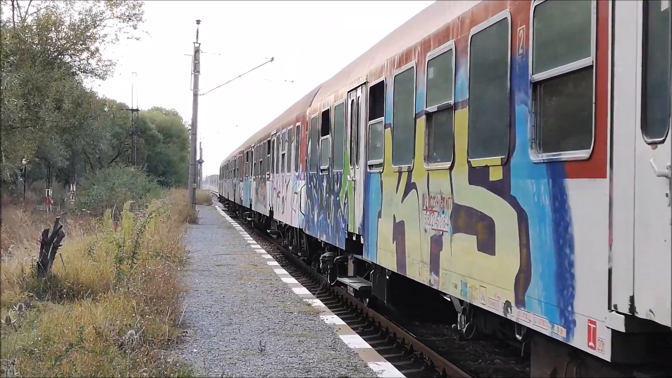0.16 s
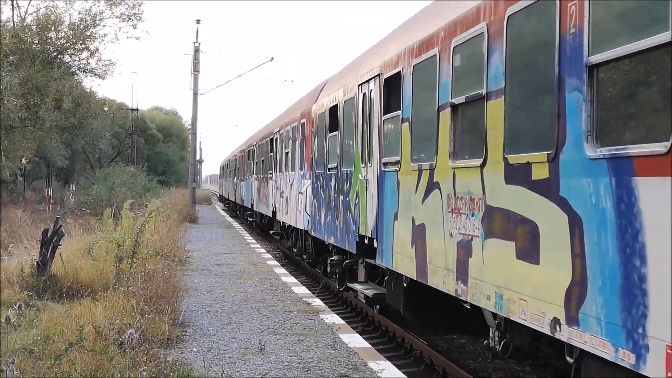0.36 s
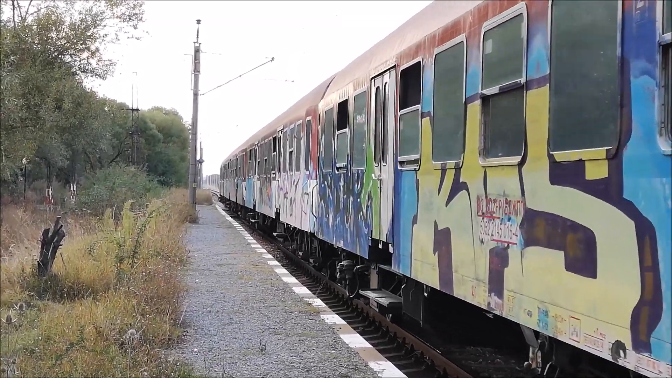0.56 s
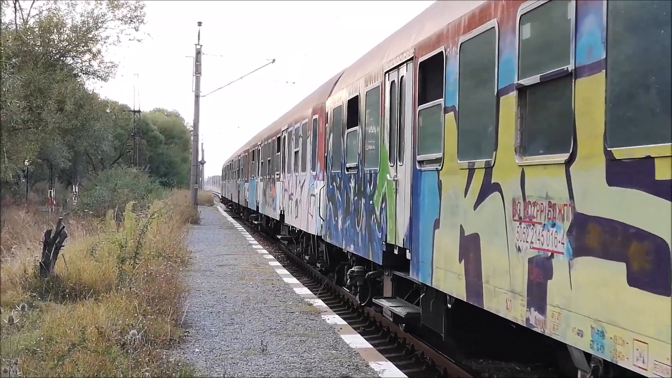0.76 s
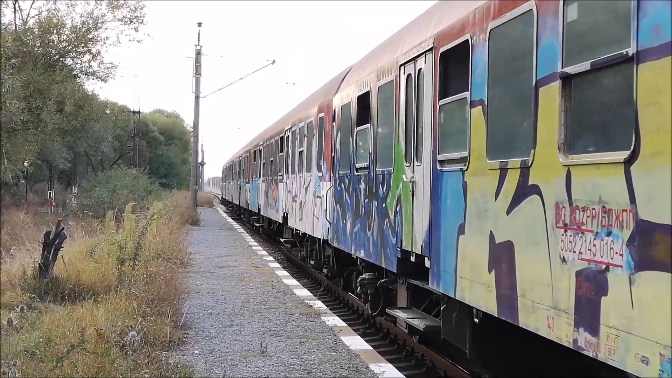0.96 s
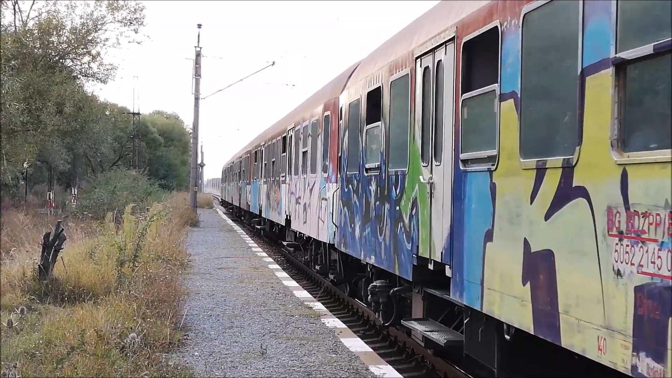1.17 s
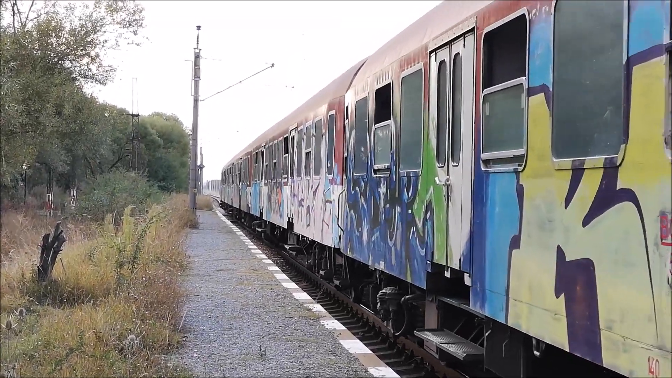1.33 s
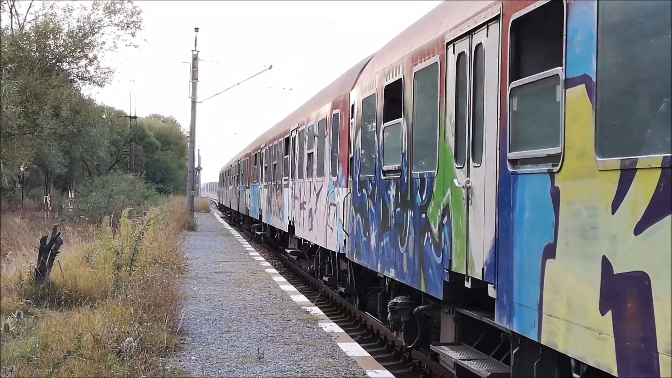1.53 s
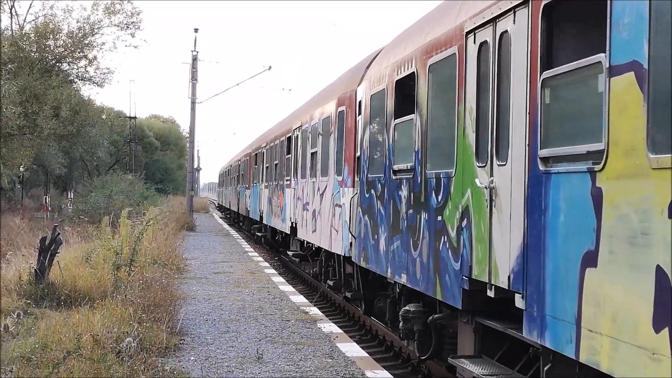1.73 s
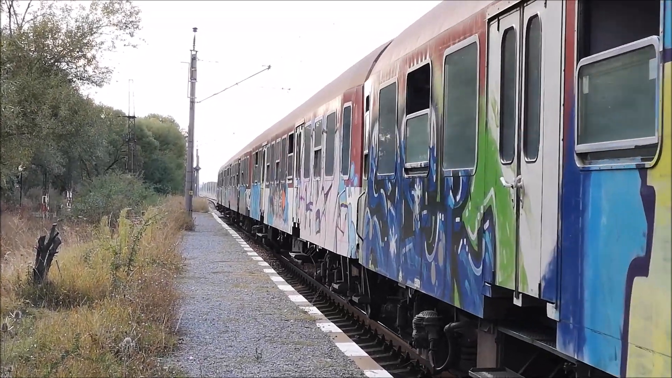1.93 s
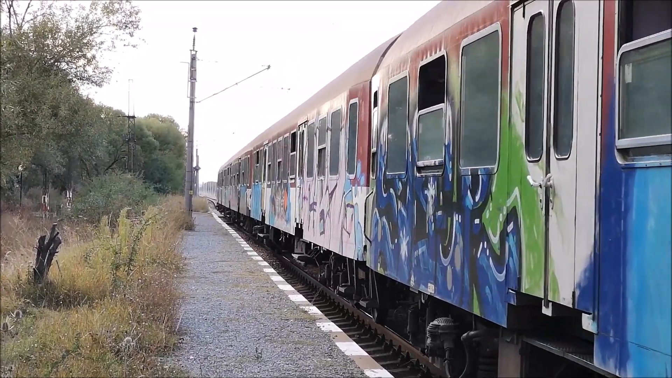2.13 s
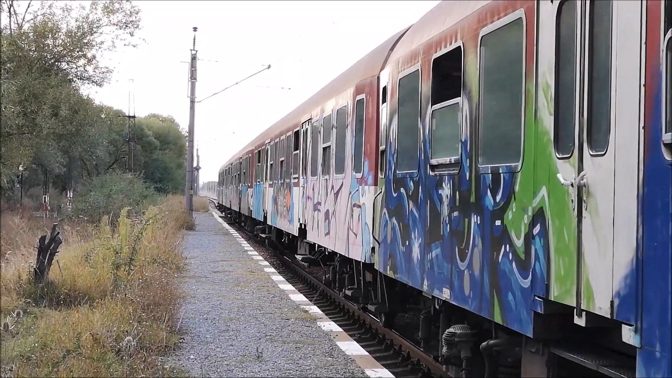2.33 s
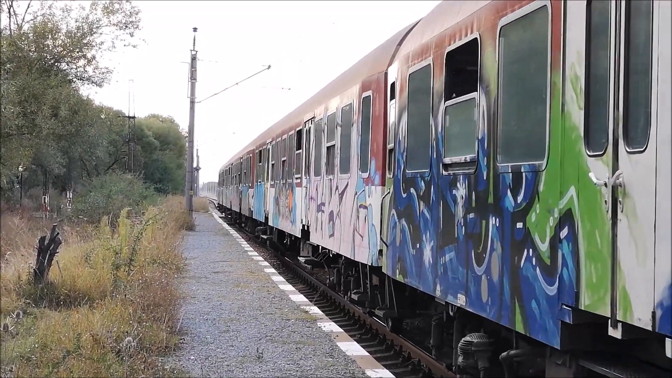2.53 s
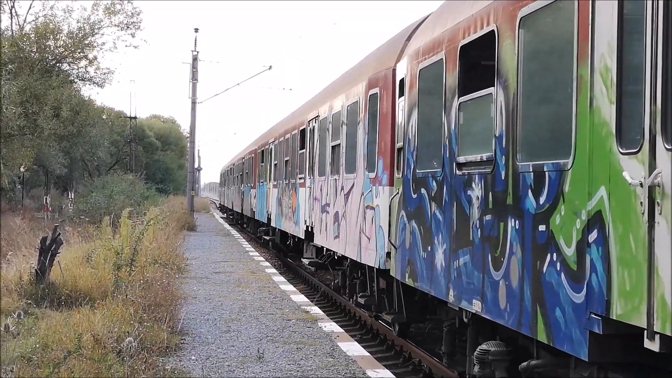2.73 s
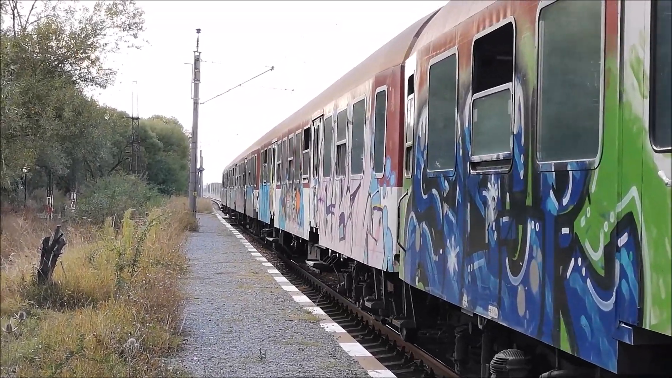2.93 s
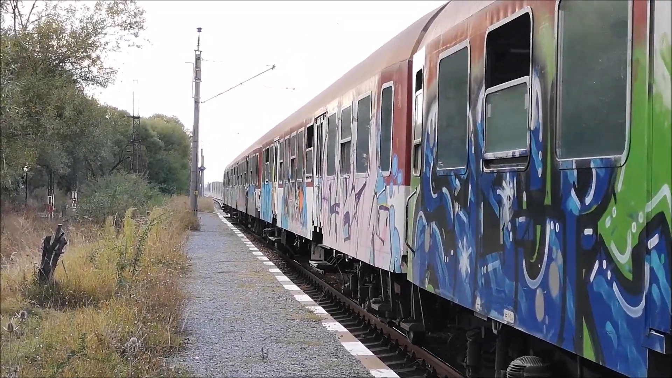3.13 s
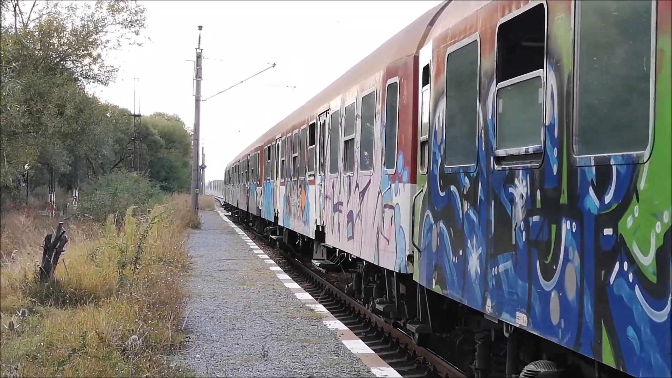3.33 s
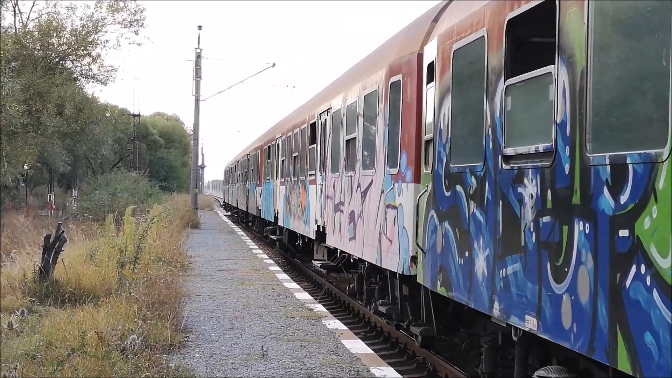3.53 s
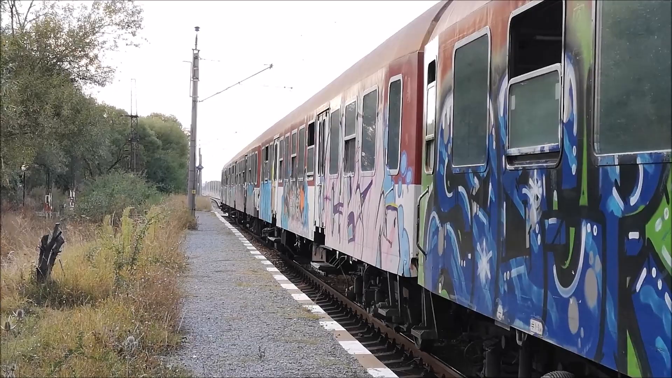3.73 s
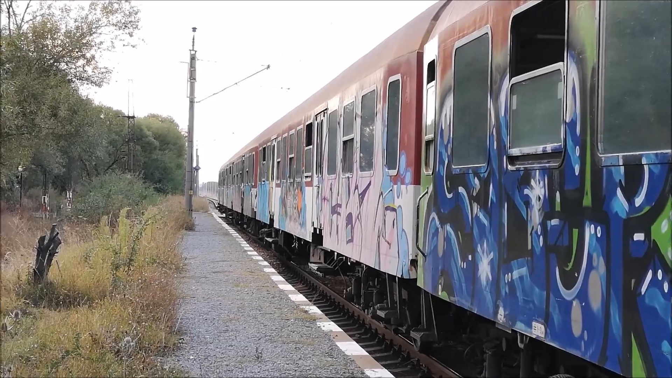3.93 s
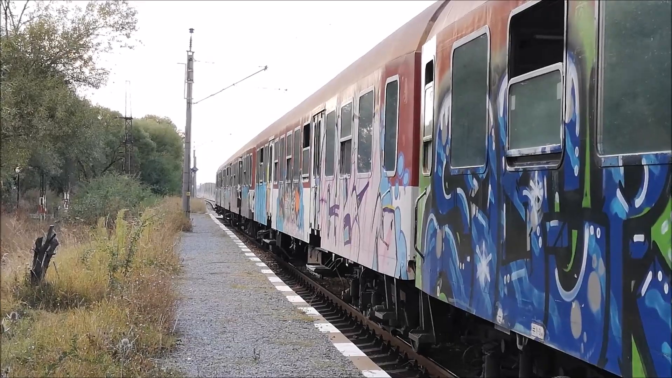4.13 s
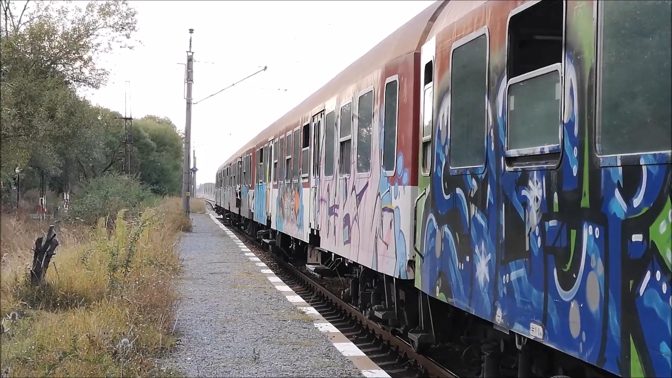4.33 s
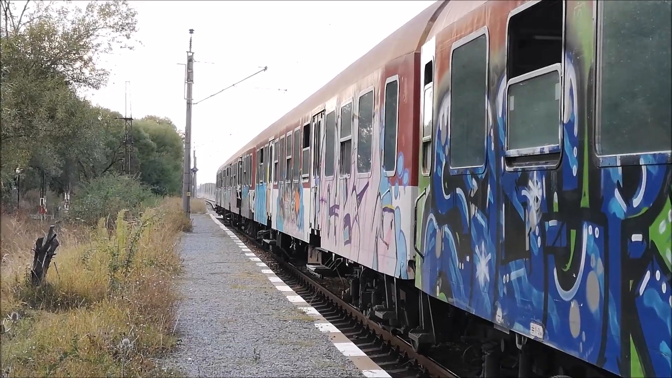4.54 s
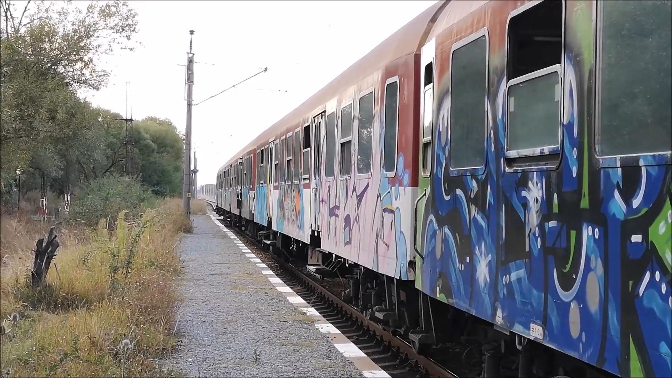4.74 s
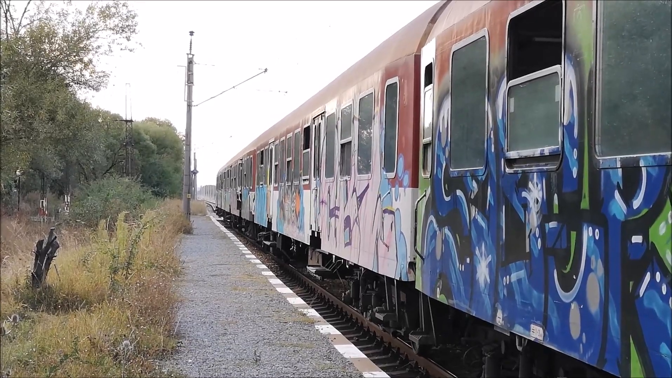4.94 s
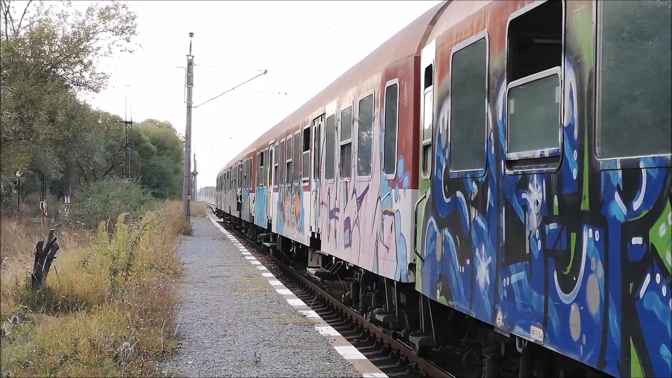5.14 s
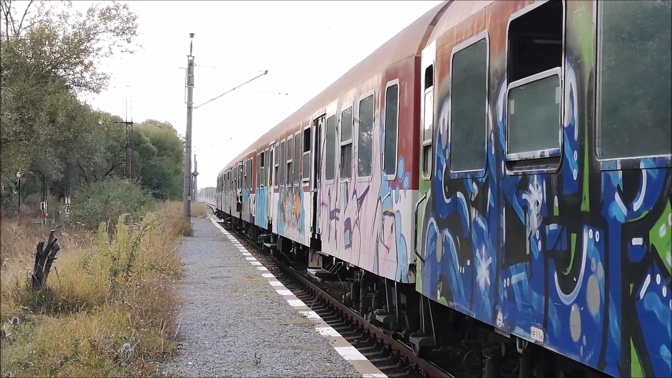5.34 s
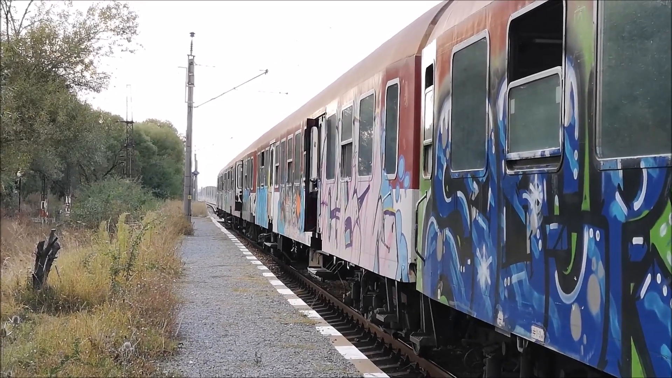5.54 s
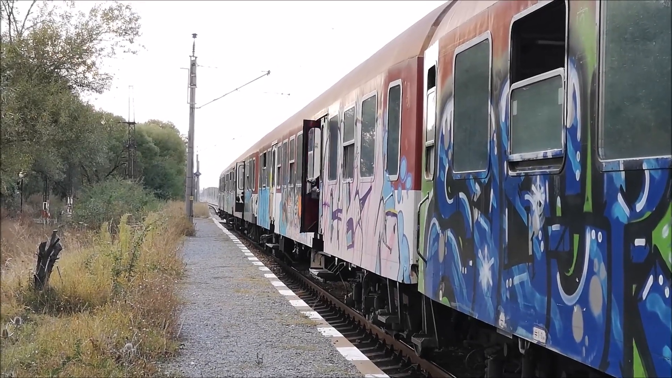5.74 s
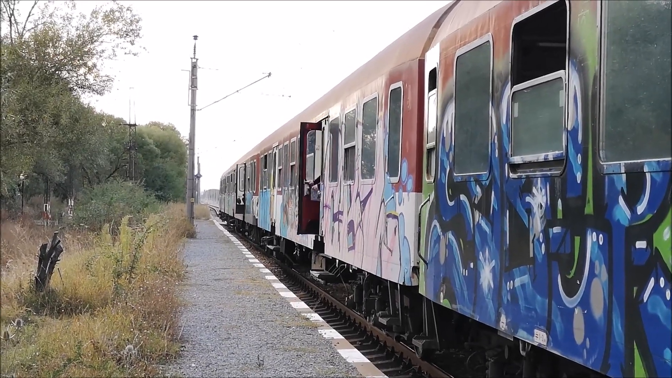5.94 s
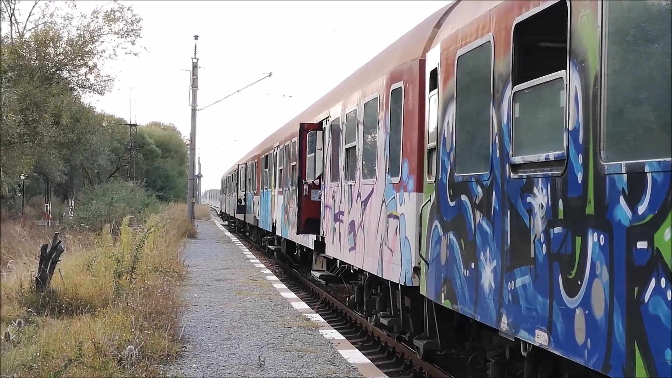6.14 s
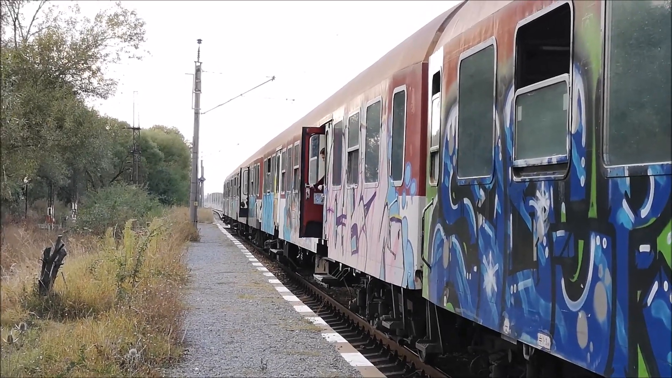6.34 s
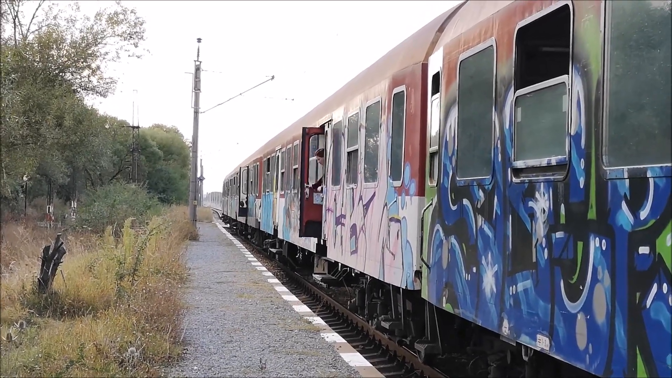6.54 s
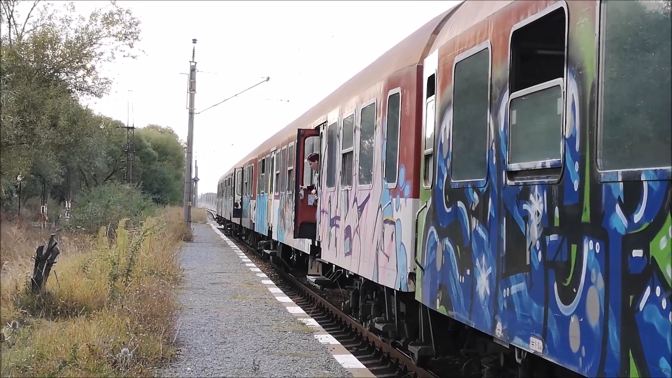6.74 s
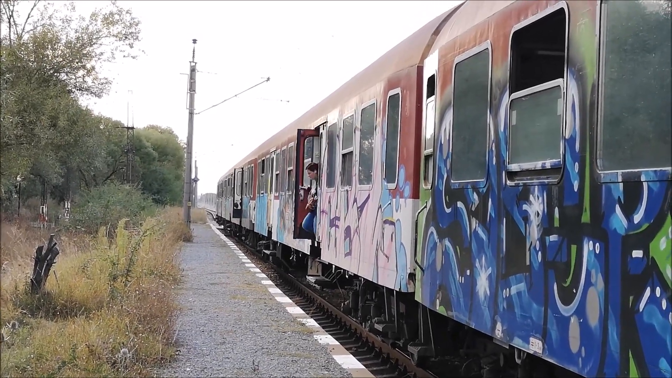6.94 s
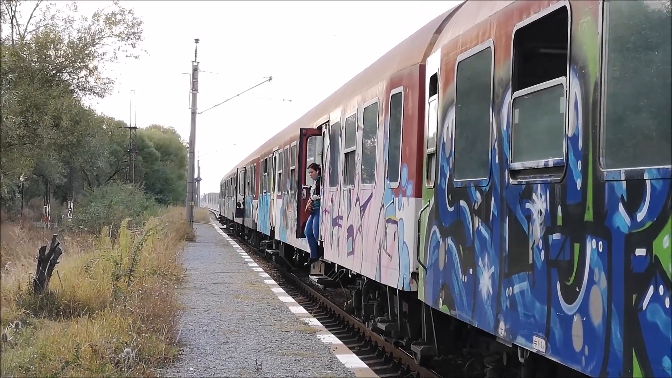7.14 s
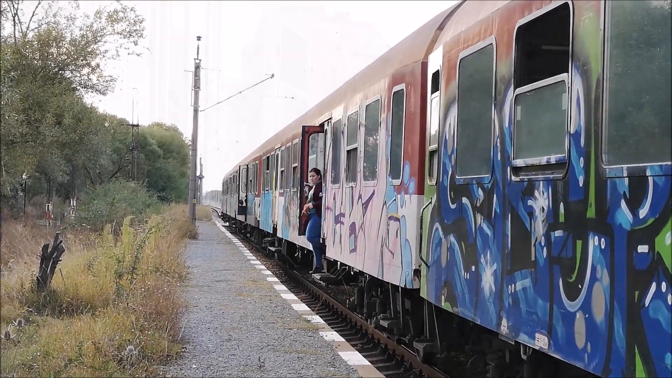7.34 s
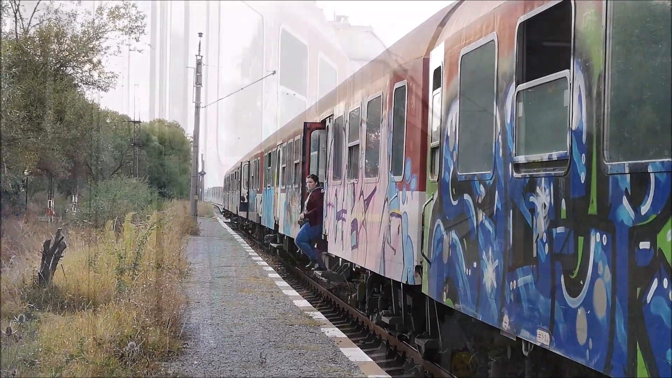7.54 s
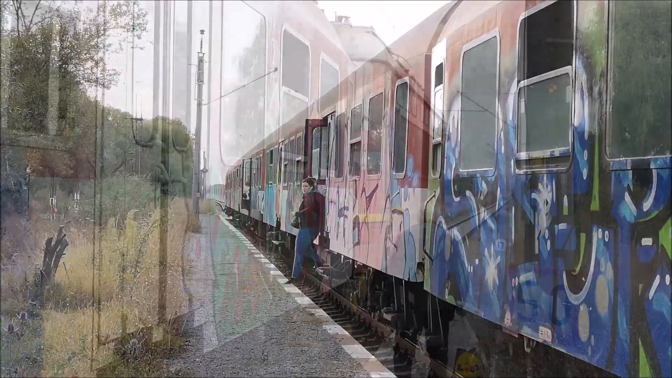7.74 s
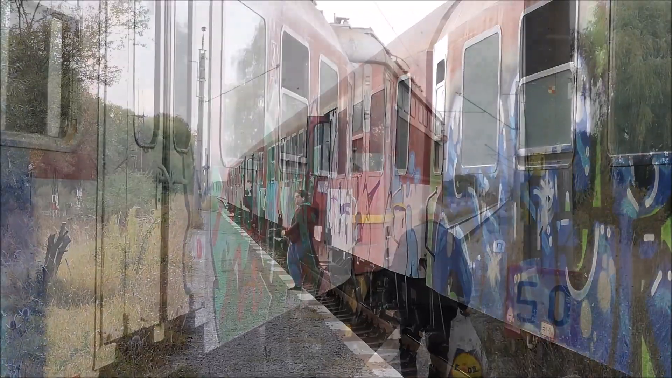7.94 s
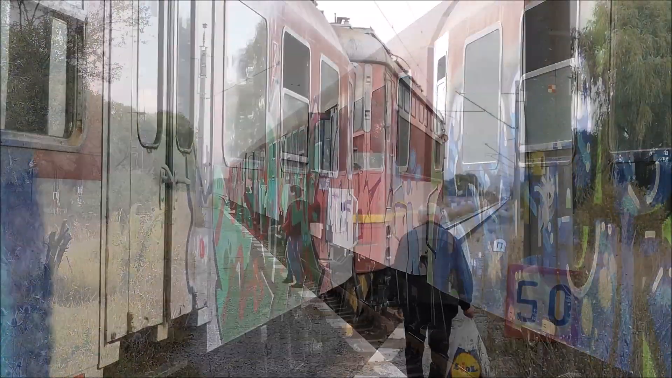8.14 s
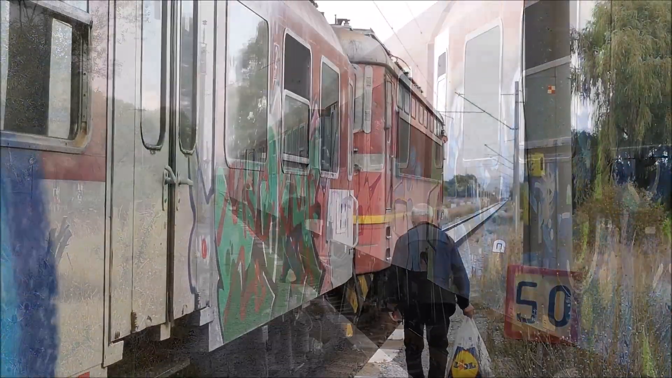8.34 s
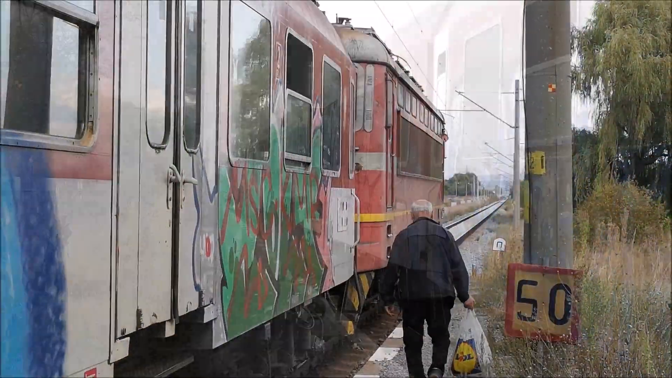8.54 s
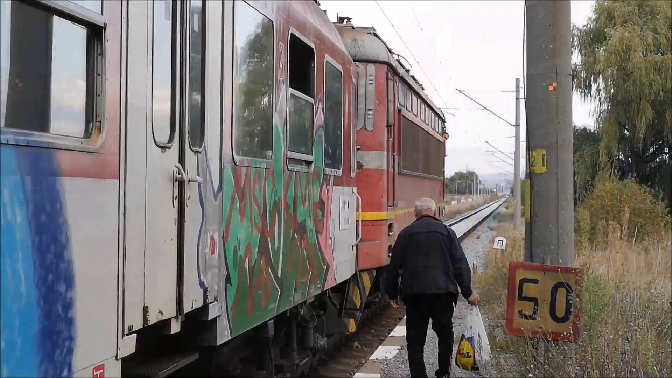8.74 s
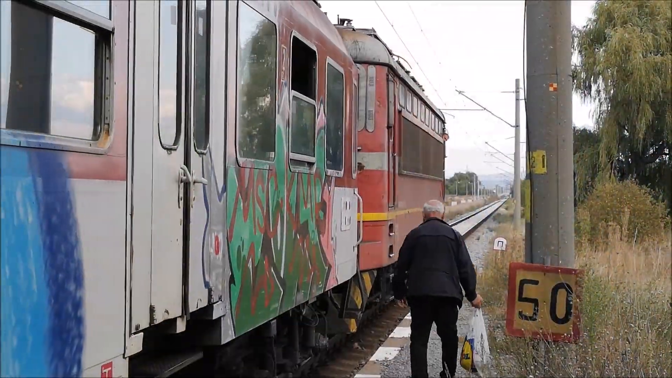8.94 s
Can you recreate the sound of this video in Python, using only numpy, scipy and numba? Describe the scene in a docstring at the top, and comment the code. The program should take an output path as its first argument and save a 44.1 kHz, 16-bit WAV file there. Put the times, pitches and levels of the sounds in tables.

```python
"""Train braking to a halt at a platform

A passenger train's wheels squeal, ever purer as they slow: friction-driven tones over coloured-noise rumble and grind.
The coaches creak and settle, air hisses from a ringing pipe, a door is unlatched with resonant knocks,
and a valve whistles and spits. Then comes the sound of a standing electric locomotive's blowers, growing louder:
duct noise and deep rumble under a blade tone that rises in surges."""
import sys
import numpy as np
from scipy import signal
from scipy.fft import rfft, irfft, next_fast_len
from scipy.io import wavfile
from scipy.ndimage import uniform_filter1d, minimum_filter1d, map_coordinates
from numba import njit

SR = 44100
rng = np.random.default_rng(int(sys.argv[2]) if len(sys.argv) > 2 else 0)


def wrap_up_sound(samples):
    """Save the sound to the file named by the first command line argument, as 16-bit audio."""
    columns = np.atleast_2d(samples).T
    # keep every value between -1 and 1, then stretch to whole-number steps
    tamed = np.clip(columns, -1, 1)
    steps = np.round(tamed * 32767).astype(np.int16)
    wavfile.write(sys.argv[1], SR, steps)


N = 400869

BITE_S, STOP_S = 3.454, 4.08  # the blocks bite hard; the wheels come to rest
LEAK_END = 8.35  # s

# Spectrum of deep rumble: [f/Hz, relative level/dB]
RUMBLE_SPECTRUM = [(11, -52), (18, 1.5), (48, 5.5), (130, -12), (170, -14), (290, -120)]
# Spectrum of droning hollow bodies: [f/Hz, relative level/dB]
DRONE_SPECTRUM = [(47, -24), (80, 2), (155, -0.5), (236, -5.5), (275, -10), (312, -13), (457, -15.5),
                  (700, -23.5), (910, -17), (1540, -120)]


def amp(db):
    """Decibels to gain."""
    return 10 ** (np.asarray(db) / 20)


def unit(x):
    """Scale to rms 1."""
    return x / np.sqrt(np.mean(np.abs(x) ** 2) + 1e-20)


def clock():
    """The time of every sample, in seconds."""
    return np.arange(N) / SR


def along(points, hz):
    """Read (Hz, value) points on a log frequency axis."""
    f, value = np.transpose(points)
    return np.interp(np.log(hz + 1), np.log(np.abs(f) + 1), value)


def train_speed():
    """The train's speed at every sample, as a share of its first speed."""
    # Braking curve: [t/s, share of the first speed]
    braking = [(0, 1), (1.5, 0.82), (3, 0.24), (3.6, 0.11), (4.2, 0.026)]
    s, share = np.transpose(braking)
    return np.interp(clock(), s, share)


def pan(db):
    """Left and right gains for a level difference; positive is louder on the left."""
    gains = amp(np.array([np.atleast_1d(db), -np.atleast_1d(db)]) / 2)
    return gains / np.sqrt(np.mean(gains ** 2, axis=0))


def wobble(rate):
    """A smooth random curve, rate knots a second."""
    return map_coordinates(rng.standard_normal(512), [clock() * rate], mode="wrap")


def held(start, end, rise_db_per_s, fall_db_per_s):
    """Gain that rises until start, holds at 1 and dies away after end."""
    t = clock()
    rise = abs(rise_db_per_s) * np.maximum(start - t, 0)
    fall = abs(fall_db_per_s) * np.maximum(t - end, 0)
    return amp(-rise - fall)


def swell(peak, rise, fall):
    """A bell-shaped gain, 10 dB down at rise seconds before its peak and fall seconds after."""
    t = clock() - peak
    return amp(-10 * np.minimum((t / np.where(t < 0, rise, fall)) ** 2, 20))


def receding(db_per_s):
    """Gain of the nearest bogie, which fades with the way travelled (db_per_s at the first speed)."""
    return amp(-db_per_s * np.cumsum(train_speed()) / SR)


def filtered(x, response):
    """x times a response of frequency."""
    m = next_fast_len(x.shape[-1] + SR // 8, real=True)
    return irfft(rfft(x, m) * response(np.fft.rfftfreq(m, 1 / SR)), m)[..., :x.shape[-1]]


def resonant(modes, size):
    """Stereo noise of rms 1 ringing in (Hz, width Hz, dB) resonances."""
    def body(f):
        total = 0
        for k, (centre, width, db) in enumerate(modes):
            peak = 1j * f * width / (centre * centre - f * f + 1j * f * width)
            total = total + (-1) ** k * amp(db) * peak  # neighbours alternate in sign
        return total
    return unit(filtered(rng.standard_normal((2, size)), body))


def rush(spectrum, ripple_db=0, spacing_hz=28):
    """Coloured stereo noise of rms 1, alike in the bass; ripple stands for the many close modes of steel parts."""
    # Stereo likeness: [f/Hz, left-right correlation]
    likeness = [(60, 1), (250, 0.97), (500, 0.14), (1000, 0.39), (2500, 0.15), (8000, .1)]

    def colour(hz):
        turn = np.arccos(np.clip(along(likeness, hz), -1, 1)) / 2
        modes = map_coordinates(rng.standard_normal(4096), [hz / spacing_hz], mode="wrap")
        return amp(along(spectrum, hz) + ripple_db * modes) * np.array([np.cos(turn), np.sin(turn)])

    mid, side = filtered(rng.standard_normal((2, N)), colour)
    return unit(np.array([mid + side, mid - side]))


def add(track, s, sound):
    """Mix a sound in at time s."""
    part = track[:, max(0, round(s * SR)):][:, :sound.shape[-1]]
    part += sound[..., :part.shape[-1]]


@njit
def resonate(kicks, keep):
    """Complex amplitude of a kicked mode that keeps a share of its motion at each step."""
    z = kicks.copy()
    for i in range(1, len(keep)):
        z[:, i] = keep[i] * z[:, i - 1] + np.sqrt(1 - keep[i] ** 2) * kicks[:, i]
    return z


def sing(hz, width_hz, skirt_hz=260, pure=0, size=16, pure_width_hz=2.07):
    """A friction-driven mode at two ears: rough contact widens the line, while a pure share of it rings on cleanly."""
    step = SR / size  # the slow amplitude is computed once every size samples
    keep = np.exp(-np.pi * np.abs(width_hz + 0 * hz)[::size] / step)
    kicks = rng.standard_normal((2, len(keep))) + 1j * rng.standard_normal((2, len(keep)))
    rough = signal.lfilter([1], [1, -np.exp(-2 * np.pi * skirt_hz / step)], resonate(kicks, keep))
    rough /= np.sqrt(np.abs(uniform_filter1d(np.abs(rough) ** 2, int(step / 10))) + 1e-12)
    # the pure share has a steady level and only its phase wanders
    share = np.clip(pure, 0, 1)
    drift = np.cumsum(rng.standard_normal(rough.shape), axis=1) * np.sqrt(2 * np.pi * pure_width_hz / step)
    z = np.sqrt(1 - share) * rough + np.sqrt(share) * np.exp(1j * drift)
    swing = np.array([np.interp(np.arange(len(hz)) / size, np.arange(len(keep)), ear) for ear in z])
    phase = 2 * np.pi * np.cumsum(hz) / SR
    return np.sqrt(2) * (swing.real * np.cos(phase) - swing.imag * np.sin(phase))


def lagged(pair, delay):
    """The sound reaches the right ear first, by delay seconds."""
    return filtered(pair, lambda hz: np.exp(1j * np.pi * hz * delay * np.array([[-1], [1]])))


def echo(x, t60=0.45, wet_db=-10):
    """Coach sides and trees scatter a short tail of decaying noise."""
    t = np.arange(SR // 2) / SR
    tail = rng.standard_normal((2, len(t))) * amp(-60 * t / t60) * (t > .006)
    return x + amp(wet_db) * signal.fftconvolve(x, tail / np.linalg.norm(tail[0]), axes=1)[:, :N]


def outdoor_hiss(level_db=-49, waver_db=0.78):
    """A soft outdoor hiss of coloured noise wavers slightly throughout."""
    # Spectrum: [f/Hz, relative level/dB]
    hiss_spectrum = [(150, -16), (250, -15), (360, -21), (700, -21.5), (1250, -16), (2200, -8.5),
                     (2450, -2.5), (3100, -27), (3940, -13.5), (5200, -15.5), (7800, -17.5), (9500, -14),
                     (11200, -36), (15000, -24.5)]
    return amp(level_db + waver_db * wobble(5.5)) * rush(hiss_spectrum, ripple_db=2.3)


def blower(start=7.365, air_db=-45, grow_db_per_s=4.5, low_db=-38, body_db=-46.5, whine_hz_per_s=115):
    """The locomotive's cooling fans sound steadily louder: air in ducts, a deep rumble and a rising blade tone."""
    # Spectrum of air in the ducts: [f/Hz, relative level/dB]
    duct_spectrum = [(120, -5), (200, -3.5), (330, -2.5), (420, 0.5), (600, -15), (800, -11), (1100, -15.5),
                     (1760, -11), (2400, -16), (3700, -16), (6500, -38), (12000, -60)]
    # Surges of the blade tone: [peak t/s, f at the peak/Hz, level/dB, 10 dB rise/s, 10 dB fall/s]
    surges = [(7.62, 450, -50, 0.12, 0.18), (8.11, 465.5, -40, 0.19, 0.36)]
    t = clock()
    level = np.clip((t - start) / 0.0077, 0, 1) * amp(grow_db_per_s * (t - start))
    air = amp(air_db) * rush(duct_spectrum, ripple_db=2.0)
    air = air + amp(low_db) * rush(RUMBLE_SPECTRUM) + amp(body_db) * rush(DRONE_SPECTRUM)
    blade = np.zeros((2, N))
    for peak, hz, db, rise, fall in surges:
        tone = sing(hz + whine_hz_per_s * (t - peak), 1.2, 17, pure=0.7)
        blade += amp(db) * swell(peak, rise, fall) * tone
    return level * air + blade


def leak(start=4.48, eases=5.05, burst_db=-44, steady_db=-49):
    """Air escapes as noise through a ringing pipe, strongly at first."""
    # Pipe resonances: [f/Hz, width/Hz, relative level/dB]
    pipe = [(2431, 41, 3), (4000, 154, -10.5), (5677, 92, -8), (6580, 34, -9.5), (7680, 220, -12),
            (8830, 54, -10.5), (10930, 100, -12.5), (12200, 57, -14), (13600, 150, -22)]
    burst = amp(burst_db) * held(start, eases, 23, 21)
    steady = amp(steady_db) * held(start, LEAK_END, 20, 13)
    return (burst + steady) * resonant(pipe, N)


def settling(body_db=-11, rest_db=-45, rest_body_db=-60, sway_db=-40, calm_s=5.38, calm_db_per_s=6,
             hum_db=-56.5, hum_hz=205):
    """The coaches heave, sway for a while after the stop and keep up a faint rumble and hum at rest."""
    # Lurches: [peak t/s, time to fall 10 dB on either side/s, level/dB]
    heaves = [(1.39, 0.33, -34), (1.92, 0.076, -35), (2.92, 0.07, -33), (3.11, 0.048, -30),
              (3.375, 0.12, -32.5), (4.529, 0.14, -29.5), (4.732, 0.056, -30.5), (4.98, 0.15, -36.5),
              (5.4, 0.11, -35.5), (8.378, 0.045, -27), (8.76, 0.07, -31)]
    heave = sum(amp(db) * swell(peak, length, length) for peak, length, db in heaves)
    motion = np.hypot(heave, amp(sway_db) * held(4.3, calm_s, 60, calm_db_per_s))
    low = np.hypot(motion, amp(rest_db)) * rush(RUMBLE_SPECTRUM)
    body = np.hypot(amp(body_db) * motion, amp(rest_body_db)) * rush(DRONE_SPECTRUM)
    hum = amp(hum_db) * held(STOP_S, LEAK_END, 60, 12) * sing(np.full(N, hum_hz), 40, 25)[0]
    return hum + low + body


def rolling(low_db=-40, body_db=-32.5, fade_db_per_s=3.8, fall_db_per_s=130, uneven_db=2,
            frame_db=-38, frame_hz=283):
    """Running gear and coach bodies rumble until the blocks bite; the near bogie frame adds a hollow note."""
    low = amp(low_db + uneven_db * wobble(6.8)) * rush(RUMBLE_SPECTRUM)
    body = amp(body_db) * receding(fade_db_per_s) * rush(DRONE_SPECTRUM)
    frame = amp(frame_db) * swell(0.23, 1, 0.7) * sing(np.full(N, frame_hz), 34, 77)[0]
    return (low + body + frame) * held(0, BITE_S, 0, fall_db_per_s)


def rubbing(colour, fast_ripple_db=1.5, slow_ripple_db=3.5, flutter_db=1.09):
    """Iron on a wheel tread; at walking pace single modes stand out of the hiss."""
    speed = np.clip(train_speed(), 0, 1)
    fast = np.sqrt(speed) * rush(colour, ripple_db=fast_ripple_db)
    slow = np.sqrt(1 - speed) * rush(colour, ripple_db=slow_ripple_db)
    return amp(flutter_db * wobble(24)) * (fast + slow)


def grind(level_db=-22, fade_db_per_s=7.0, speed_power=0.035, fall_db_per_s=25):
    """The brake blocks grind, weaker as the bogie draws away and slows."""
    # Spectrum: [f/Hz, relative level/dB]
    grind_spectrum = [(260, -31), (450, -17.5), (688, -17.5), (1020, -6.5), (1350, -9.5), (1550, -7),
                      (1820, 0), (2020, 0), (2560, -1), (3150, -8), (3660, -1.5), (3950, -7.5), (4300, -3),
                      (5590, -82), (9460, -120)]
    force = train_speed() ** speed_power * receding(fade_db_per_s) * held(0, STOP_S, 0, fall_db_per_s)
    return amp(level_db) * force * rubbing(grind_spectrum)


def fizz(level_db=-28.5, fade_db_per_s=5, bite_db=-35, rise_db_per_s=130, sag_db_per_s=9, fall_db_per_s=85):
    """The blocks' high hiss fades with distance and flares when they bite for the last time."""
    # Spectrum: [f/Hz, relative level/dB]
    fizz_spectrum = [(3000, -28), (4200, -23), (5500, 6), (6400, -5), (7400, 4), (9000, -1.5),
                     (10500, -5.5), (12500, -7.5), (14200, -8.5), (15200, -36)]
    bite = amp(bite_db) * held(BITE_S, BITE_S, rise_db_per_s, sag_db_per_s)
    force = amp(level_db) * receding(fade_db_per_s) + bite
    return force * held(0, STOP_S, 0, fall_db_per_s) * rubbing(fizz_spectrum)


def knocks(attack=0.00093, crack_db=5, crack_t60=0.013):
    """Each knock cracks sharply, then rings in resonances of a door panel, a latch and a hollow coach body."""
    # Knocks: [t/s, level/dB, relative thud/dB, relative latch ring/dB, t60/s]
    blows = [(4.5, -52, 9, 6, 0.28), (4.91, -42, -2, -8, 0.16), (5.16, -43, 4, -23, 0.25),
             (5.335, -45.5, 17, 2, 0.39), (5.478, -36, 3, -8, 0.15), (5.545, -41.5, -1, 3, 0.21),
             (5.799, -49, -14, 0, 0.12), (6.002, -31, -4, -7, 0.15), (6.09, -36, -2, -10, 0.13),
             (6.141, -45, -6, -6, 0.12), (7.2, -51, 8, 11, 0.22), (7.57, -52, -5, 11, 0.1),
             (7.7, -55, -5, 9, 0.11), (8.551, -42, -9, -2, 0.22), (8.601, -34.5, -16, -3, 0.31)]
    # Door panel resonances: [f/Hz, width/Hz, relative level/dB]
    panel = [(430, 77, -7), (860, 130, 0.5), (1130, 110, -1.5), (1320, 99, 0), (1830, 170, 0)]
    # Latch resonances: [f/Hz, width/Hz, relative level/dB]
    catch = [(2370, 370, 0.5), (3620, 640, 3), (4970, 1800, -7.5)]
    coach_body = [(70, 43, 0), (150, 61, -1), (248, 57, -11.5)]
    out, t = np.zeros((2, N)), np.arange(SR // 2) / SR
    for s, db, thud_db, bright_db, t60 in blows:
        thud = amp(thud_db) * resonant(coach_body, len(t))[0]
        ring = resonant(panel, len(t)) + amp(bright_db) * resonant(catch, len(t)) + thud
        force = amp(-60 * t / t60) + amp(crack_db - 60 * t / crack_t60)
        add(out, s, amp(db) * force * (1 - np.exp(-t / attack)) * ring)
    return out


def squeaks(level_db=1, count=3):
    """Short gliding tones with overtones: squeaks and creaks of blocks, springs and hinges, and late scuffs,
    perhaps of feet or a bag."""
    # Squeaks, creaks and scuffs:
    # [t/s, length/s, first f/Hz, last f/Hz, relative level/dB, overtone step/dB, line width/Hz]
    glides = [(2.601, 1.7, 2818, 2763, -44, -30, 17), (3.199, 0.89, 895, 933, -59, -13, 8),
              (3.45, 0.082, 2390, 2230, -29.5, -25, 120), (3.587, 0.11, 2060, 1970, -43, -26, 28),
              (3.683, 0.24, 2180, 2227, -35.5, -24, 32), (3.717, 0.23, 2520, 2470, -34.5, -25, 33),
              (3.864, 0.26, 2250, 2415, -43, -20, 22), (3.892, 0.15, 1575, 1622, -48, -15, 18),
              (3.898, 0.073, 3160, 3370, -41, -6, 87), (3.977, 0.28, 84.1, 77, -39, -8, 1.4),
              (3.979, 0.15, 1848, 1847, -44, -20, 7), (4.016, 0.08, 3710, 3645, -34, -22, 13),
              (4.02, 0.089, 1110, 1086, -49, -15, 3.3), (4.111, 0.13, 244, 250, -49, -15, 4.4),
              (4.241, 0.12, 3410, 3467, -43, -25, 44), (4.468, 0.45, 1048, 905.2, -54, 0.5, 660),
              (4.473, 0.1, 1784, 1613, -42.5, -1.5, 350), (4.531, 0.27, 1520, 1517, -46.5, -3, 66),
              (4.567, 0.2, 2090, 2090, -38.5, -22, 19), (5.519, 0.093, 350, 318, -46.5, -20, 55),
              (5.644, 0.088, 606, 575, -57, 1, 13), (5.933, 0.08, 880, 903, -49.5, -3, 9),
              (6.177, 0.16, 739, 794, -47.5, -16, 59), (6.25, 0.07, 5250, 5000, -57, -30, 200),
              (6.34, 0.11, 550, 604, -53.5, -22, 9), (7.531, 0.28, 963, 1012, -51.5, -22, 15),
              (8.077, 0.12, 523, 638, -45, -20, 13), (8.542, 0.044, 2570, 2770, -32, -24, 690),
              (8.592, 0.062, 2785, 3090, -31, -24, 740), (8.59, 0.08, 1117, 1250, -39, -6, 22)]
    out, t = np.zeros((2, N)), np.arange(2 * SR) / SR
    for s, length, first_hz, last_hz, db, step_db, width in glides:
        u = t[t < length] / length
        hz = first_hz + (last_hz - first_hz) * u
        tone = 0
        for k in range(count):
            partial_db = step_db * k * (k + 1) / 2 - 2.0 * k
            tone = tone + amp(partial_db) * sing((k + 1) * hz, (k + 1) * width)
        add(out, s, amp(db + level_db) * np.sqrt(np.abs(np.sin(np.pi * u))) * tone)
    return out


def chirp(start=7.96, length=0.098, foot_hz=2790, arch_hz=260, level_db=-33, step_db=-6, width_hz=55, count=3):
    """One high chirp arches up and partly back, with overtones and a soft tail."""
    hz = foot_hz + arch_hz * np.sin(np.pi * np.clip((clock() - start) / length, 0, 0.85))
    tone = sum(amp(step_db * k) * sing((k + 1) * hz, (k + 1) * width_hz) for k in range(count))
    return amp(level_db) * held(7.98, 7.995, 900, 200) * tone


def valve(start=6.672, first_hz=1505, whistle_db=-22, spit_db=-29.5, nozzle_db=-32, t60=0.27, overtone_db=-8,
          sputter_db=1.5, open_s=0.045, shut_s=0.1):
    """An air valve whistles as it opens, then breaks into a short sputtering hiss."""
    # Spectrum of the spit: [f/Hz, relative level/dB]
    spit_spectrum = [(240, -57), (400, -19), (935, -22), (1090, -19), (1230, -31), (1520, 2), (1740, -19),
                     (2360, -9), (2580, -32), (3610, -5), (5680, -25), (9520, -8), (15000, -40)]
    # Nozzle resonances: [f/Hz, width/Hz, relative level/dB]
    nozzle = [(3080, 110, -1), (3730, 150, -5), (4600, 100, -1), (7460, 420, -1.5), (9600, 400, -9)]
    t = np.arange(SR // 2) / SR
    hz = first_hz + 120 * t
    rise = 1 - np.exp(-t / 0.021)  # the overtone builds up later
    tone = sing(hz, 5, 60, pure=0.6) + rise * amp(overtone_db) * sing(2 * hz, 60)
    spit = amp(spit_db) * rush(spit_spectrum, ripple_db=6.0, spacing_hz=89.9)
    jet = spit + amp(nozzle_db) * resonant(nozzle, N)
    out = held(start + open_s, start + shut_s, 420, 310) * amp(sputter_db * wobble(160)) * jet
    add(out, start, amp(whistle_db - 60 * t / t60) * (1 - np.exp(-t / 0.004)) * tone)
    return out


def chatter(level_db=-43, low_hz=1800, high_hz=12500, length_s=0.1, spread_db=3, glide=0.015, width_hz=25,
            count=36):
    """In the last turn of the wheels the blocks stick and slip, sounding brief gliding partials at random."""
    out, u = np.zeros((2, N)), np.linspace(0, 1, int(length_s * SR))
    for (when, pitch), (size, slope) in zip(rng.random((count, 2)), rng.standard_normal((count, 2))):
        hz = low_hz * (high_hz / low_hz) ** pitch * (1 + glide * slope * u)
        partial = amp(level_db + spread_db * size) * np.sin(np.pi * u) * sing(hz, width_hz)
        add(out, BITE_S + when * (STOP_S - BITE_S), partial)
    return out


def overtones(skirt_hz=130, pure=0.11, waver_db=0.86, last_s=4.15, fall_db_per_s=110):
    """Other wheel modes take turns to ring, narrow as the train slows, and die once it stands."""
    MODE_1, MODE_2, MODE_3, MODE_4, MODE_5, MODE_6 = 3815, 8112, 9460, 11641, 13554, 14003  # Hz
    # Mode swells:
    # [peak t/s, f/Hz, level/dB, 10 dB rise/s, 10 dB fall/s, width at the first speed/Hz, left-right/dB]
    wheel_modes = [(0.3, 9540, -33.5, 1.14, 1.4, 201, -10.5), (1.65, MODE_5, -29, 0.6, 0.85, 25, -0.5),
                   (1.95, MODE_2, -14.3, 1.63, 1.3, 77, -4), (2.801, 9390, -39.5, 0.92, 0.87, 151, -5),
                   (3.1, MODE_6, -46, 3, 0.69, 60, -8), (3.3, MODE_4, -38.5, 1.3, 0.58, 160, -12),
                   (3.65, MODE_1, -36.5, 0.98, 0.47, 400, -6), (3.8, MODE_3, -32, 0.64, 0.47, 397, -8.5)]
    speed = train_speed()
    out = np.zeros((2, N))
    for peak, hz, db, rise, fall, width, side in wheel_modes:
        level = amp(db + waver_db * wobble(7)) * swell(peak, rise, fall)
        out += level * pan(side) * sing(np.full(N, hz), width * speed, skirt_hz, pure)
    return out * held(0, last_s, 0, fall_db_per_s)


def squeal(width_hz=60, skirt_hz=130, fast_pure=0.14, slow_pure=0.7, pure_speed=0.19):
    """Each wheel sings at its own pitch and beats with the others; slower bouts are narrower and purer."""
    HZ_A, HZ_B, HZ_C, HZ_D, HZ_E = 4668, 4706, 4727, 4749, 4812  # the wheels' notes
    # Bouts, each on one wheel's note:
    # [start t/s, end t/s, f/Hz, level/dB, left-right/dB, rise/(dB/s), fall/(dB/s)]
    bouts = [(0, 2.1, HZ_A, -25, -7, 60, 28), (0, 1.35, HZ_D, -21.5, -11, 62, 20),
             (0, 1.2, HZ_E, -19.5, -5.5, 60, 55), (0.1, 0.66, HZ_B, -19.5, -6, 60, 10),
             (2.15, 4.11, HZ_B, -21, -8, 49, 60), (2.8, 3.6, HZ_A, -17, -8, 16, 55),
             (3.5, 3.92, HZ_C, -12.3, 10, 128, 130), (4.0, 4.13, HZ_A, -23.5, -15, 152, 72),
             (4.0, 4.2, HZ_D, -12.2, -21, 132, 175), (4.55, 4.66, HZ_D, -40, -12, 55, 88)]
    speed = train_speed()
    pure = fast_pure + (slow_pure - fast_pure) * np.exp(-speed / pure_speed)
    out = np.zeros((2, N))
    for start, end, hz, db, side, rise, fall in bouts:
        bout_pure = np.interp((start + end) / 2, clock(), pure)  # taken at mid-bout
        tone = sing(np.full(N, hz), width_hz * speed, skirt_hz, bout_pure)
        out += amp(db) * held(start, end, rise, fall) * pan(side) * tone
    return out


def scene():
    """Everything as heard from the platform."""
    # Stereo balance of rolling and grinding: [f/Hz, left-right/dB]
    tread_balance = [(60, 0.5), (120, 0.0), (240, 2), (470, -4), (940, -5), (1860, 8.5), (3700, -2),
                     (7350, -7), (14600, -3.5)]
    treads = filtered(grind() + rolling(), lambda hz: pan(along(tread_balance, hz)))
    coaches = lagged(outdoor_hiss() + leak() + settling() + treads + fizz(), delay=0.000266)
    echoing = echo(knocks() + squeaks() + chirp() + valve() + chatter())
    return blower() + coaches + echoing + overtones() + squeal()


def record(dry, ceiling=.93, top_hz=15200):
    """A smooth limiter holds down the highest peaks, then everything from top_hz up is cut."""
    room = np.minimum(1, ceiling / (np.abs(dry).max(axis=0) + 1e-9))
    gain = uniform_filter1d(minimum_filter1d(room, size=401), size=401)
    return filtered(dry * gain, lambda hz: hz < top_hz)


dry = scene()
out = record(dry)
wrap_up_sound(out)
```